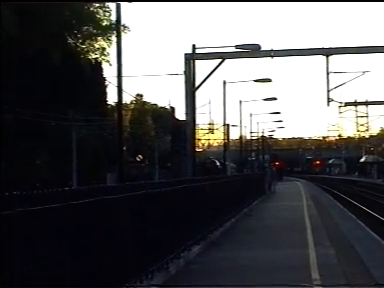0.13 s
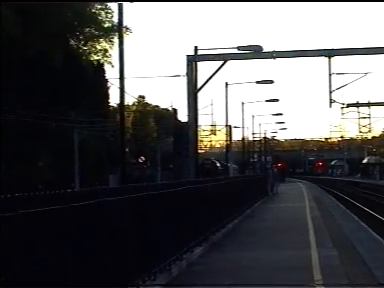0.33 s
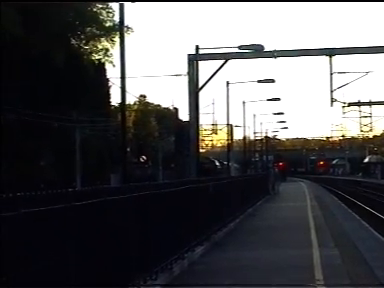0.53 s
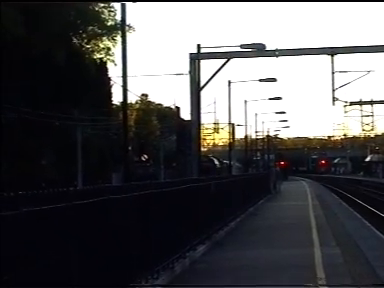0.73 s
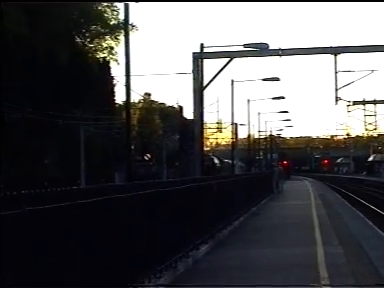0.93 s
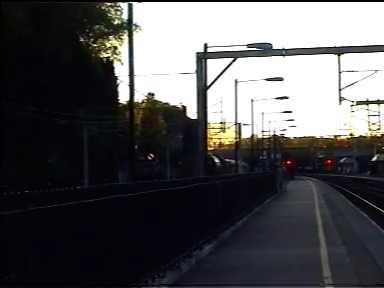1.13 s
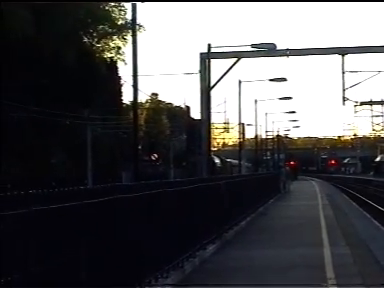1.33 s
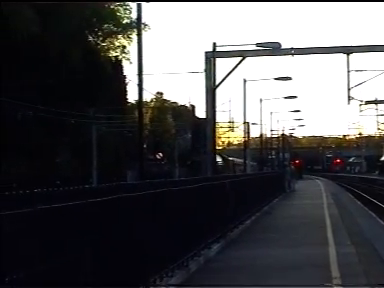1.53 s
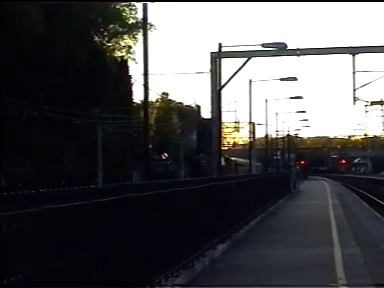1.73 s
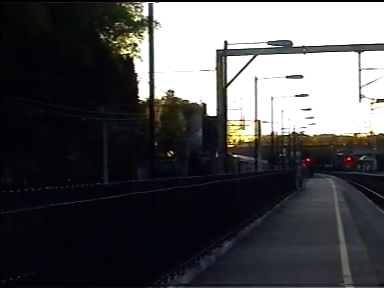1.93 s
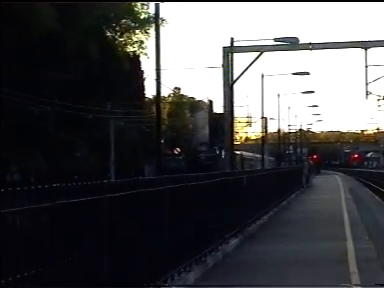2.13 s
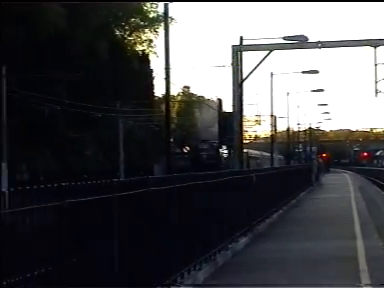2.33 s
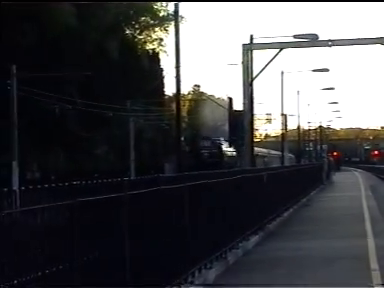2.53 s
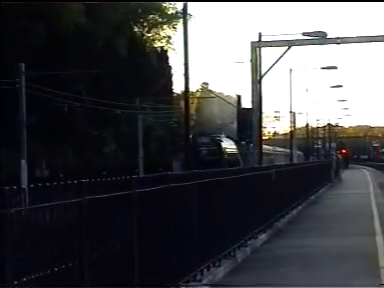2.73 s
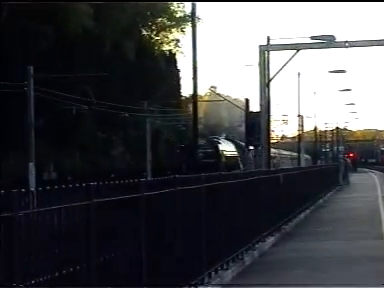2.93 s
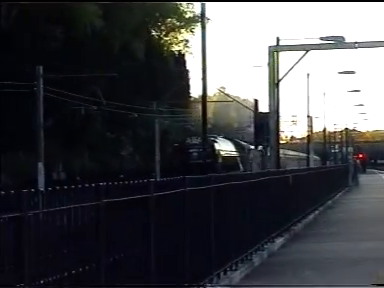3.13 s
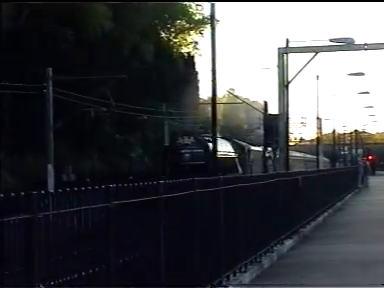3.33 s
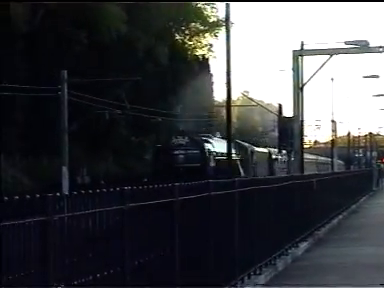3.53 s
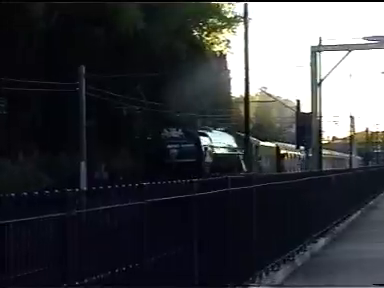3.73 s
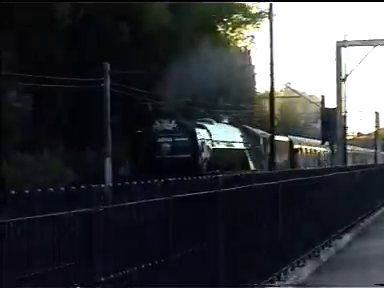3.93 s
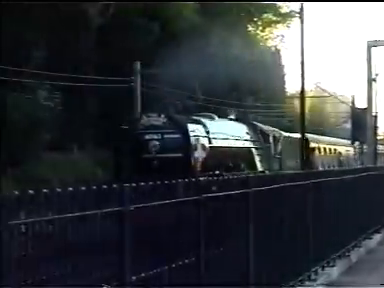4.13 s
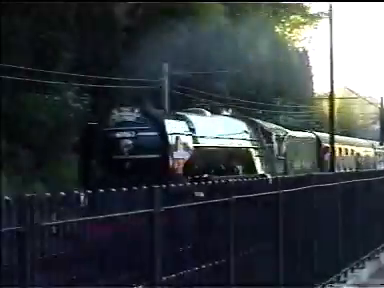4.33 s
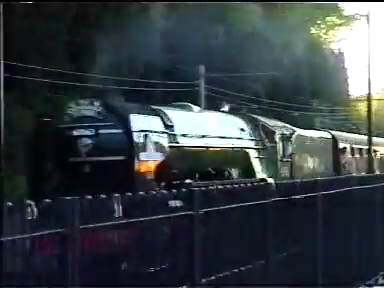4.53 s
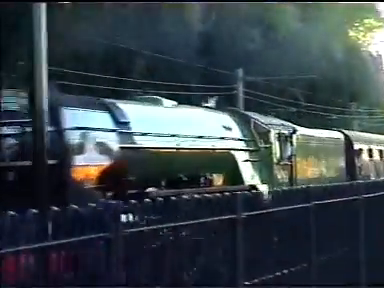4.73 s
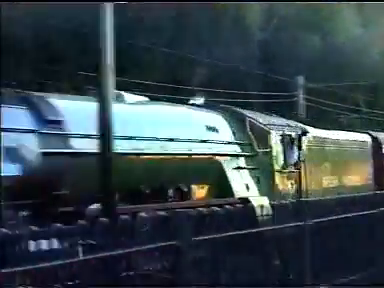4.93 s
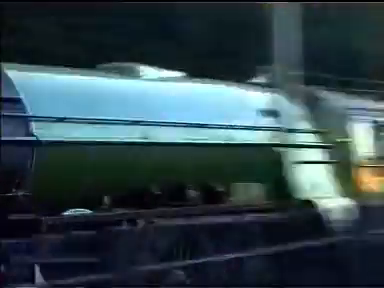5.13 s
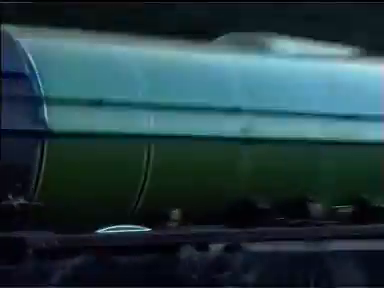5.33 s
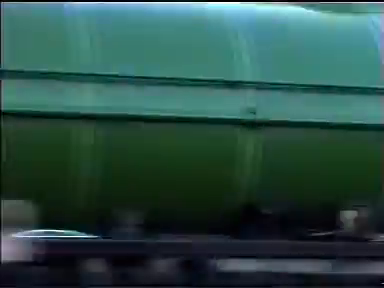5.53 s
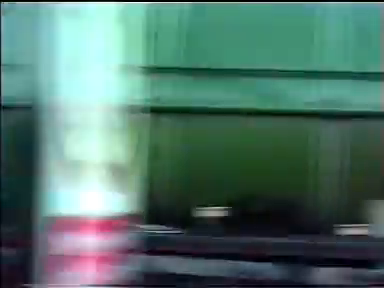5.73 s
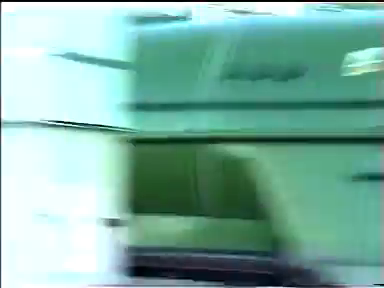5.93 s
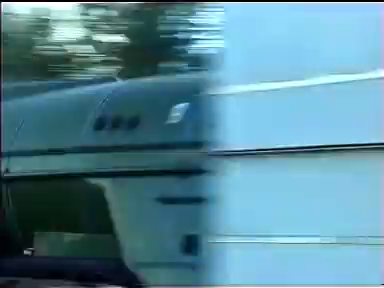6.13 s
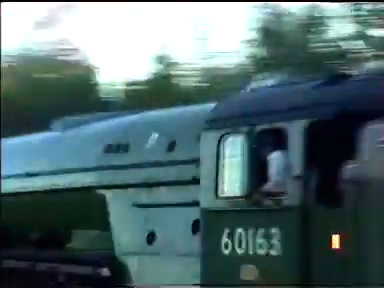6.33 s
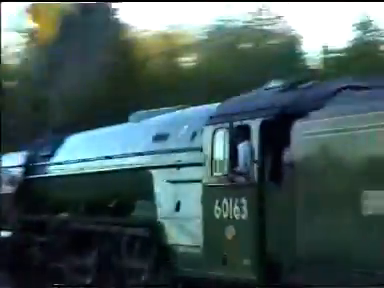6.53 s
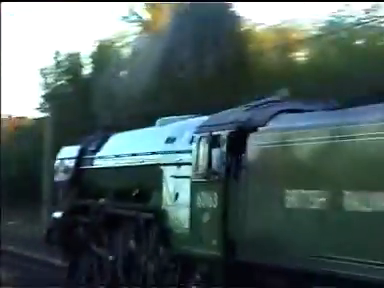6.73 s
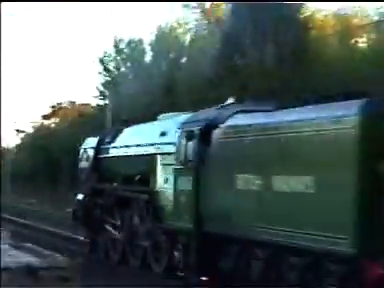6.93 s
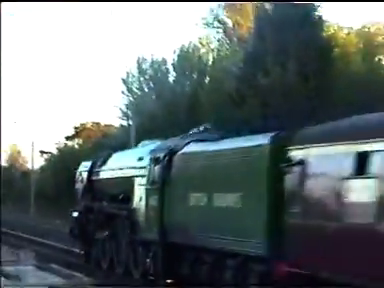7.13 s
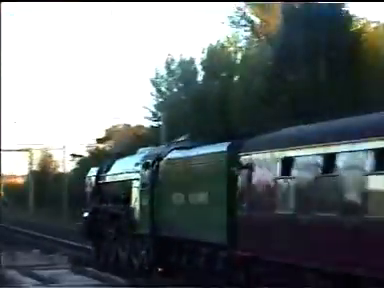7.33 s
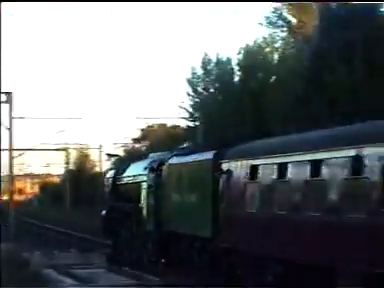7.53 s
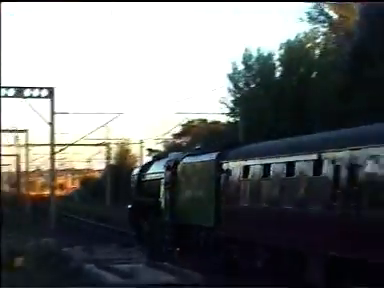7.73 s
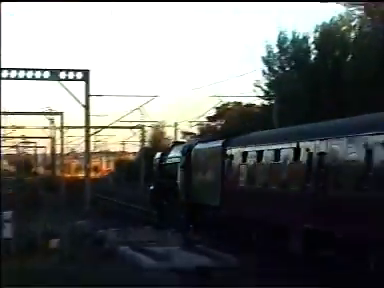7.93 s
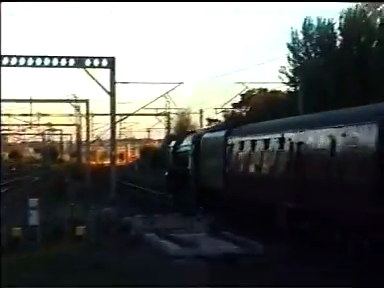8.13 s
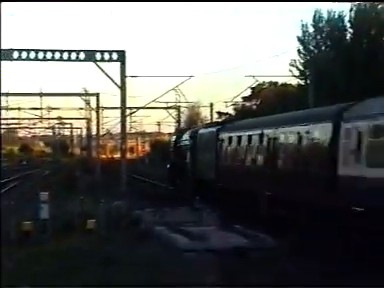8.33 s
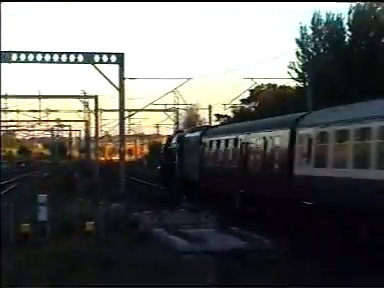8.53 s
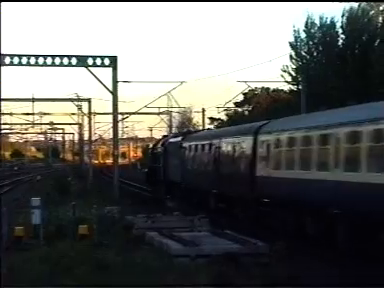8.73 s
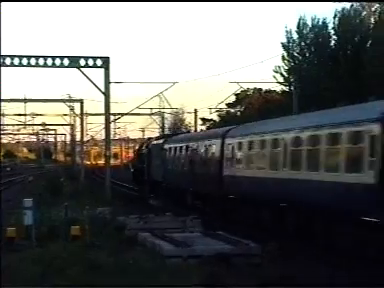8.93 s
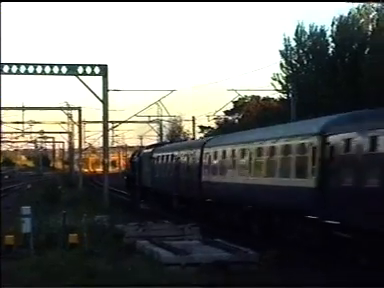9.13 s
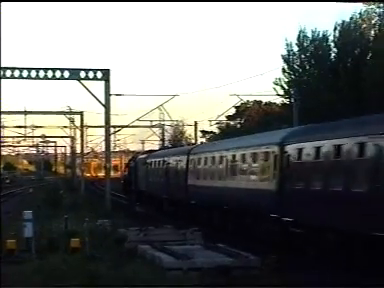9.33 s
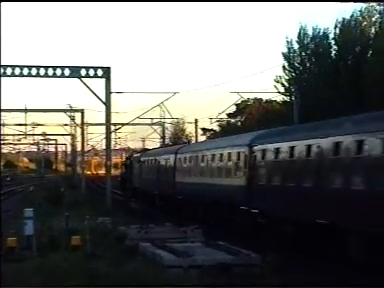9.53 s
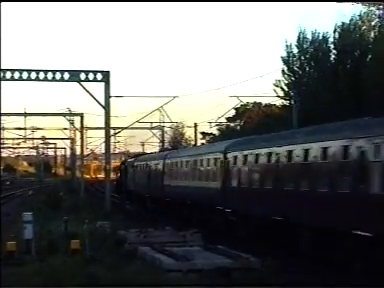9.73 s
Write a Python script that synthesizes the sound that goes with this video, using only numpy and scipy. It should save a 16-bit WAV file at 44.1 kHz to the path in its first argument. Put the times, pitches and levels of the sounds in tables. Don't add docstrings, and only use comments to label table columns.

```python
import sys
import numpy as np
from scipy import signal
from scipy.fft import rfft, irfft, next_fast_len
from scipy.io import wavfile
from scipy.ndimage import uniform_filter1d, map_coordinates

SR = 44100
rng = np.random.default_rng(int(sys.argv[2]) if len(sys.argv) > 2 else 0)


def transcribe(signal):
    frames = np.atleast_2d(signal).T
    limited = np.clip(frames, -1, 1)
    pcm = np.round(limited * 32767).astype(np.int16)
    wavfile.write(sys.argv[1], SR, pcm)


def level_to_linear(level):
    exponent = np.asarray(level, float) / 20
    return 10 ** exponent


N = 431738
M = next_fast_len(N, True)
T, F = np.arange(N) / SR, np.fft.rfftfreq(M, 1 / SR)
SPEED_MS, PASS_S, GAP_M = 23.5, 5.5, 8

# time_s, echo_delay_ms, echo_share, port_likeness (0-1), left_lag_samples
PATH = [(0, 1.56, 0.3, 0.9, -0.043), (2.5, 1.52, 0.13, 0.92, 0.53), (4.5, 1.63, 0.21, 0.77, 0.46),
        (5.4, 1.7, 0.1, 0.74, 0.85), (6.5, 1.6, 0.09, 1, 0.58), (7.5, 1.67, 0.07, 0.5, 0.27),
        (9.79, 1.48, 0.21, 0, -1.2)]
# time_s, level_db
ENGINE = [(0, -41.5), (1.2, -39), (2.3, -35.5), (2.7, -33), (3.2, -30.5), (3.5, -28.5), (4.5, -30.5),
          (5.4, -32.5), (5.9, -36.5), (6.7, -40.5), (7.4, -44), (8.2, -46.5), (9.2, -45.5), (9.79, -48)]
# time_s, level_db
TRACK = [(0, -35.5), (1, -33), (2.4, -28.5), (3, -27), (3.5, -24), (4.4, -25), (5.5, -24), (6.2, -24.5),
         (6.7, -26), (8, -26.5), (9.79, -27)]
# time_s, level_db, half_length_s
RAIL_SURGES = [(.3, 0.5, .08), (.5, -1, 0.054), (.6, -1.5, .04), (1.0, -3, 0.048), (1.3, -0.5, .1),
               (1.51, -3.5, 0.04), (1.7, 0.5, 0.057), (2.17, 0, 0.046), (2.26, -4, 0.021),
               (2.46, -3.5, 0.044), (2.7, -2, .06), (2.9, 3, 0.066), (3.55, 1, .08), (3.96, -3.5, 0.032),
               (4.62, -1.5, .05), (4.75, 2.5, 0.063), (5.36, -2, 0.05), (5.51, 2, 0.036), (5.68, -1, .08),
               (5.89, 0.5, 0.042), (6.34, 1.5, 0.14), (6.53, -2, 0.056), (6.68, 0, 0.036), (7.2, 1, 0.045),
               (7.36, -0.5, .08), (7.6, 1.5, 0.11), (7.92, 1.5, 0.047), (8.21, -1.2, .04), (8.85, 0, .04),
               (8.97, 0.5, 0.046), (9.73, -1, 0.038)]
# time_s, level_db, half_length_s
WHEEL_SURGES = [(.55, -5, 0.031), (1.717, 2, .05), (2.43, 2, 0.055), (2.72, 0, .05), (2.96, 1.5, 0.045),
                (3.17, 0, 0.12), (3.71, 2.5, .05), (5.09, 1, .05), (5.282, 1.5, 0.067), (5.9, 2, 0.084),
                (6.07, 2, .05), (6.328, 1, 0.045), (6.61, -3, .03), (6.69, 0.5, 0.036), (6.767, -3, 0.033),
                (6.95, -1.5, .08), (7.1, -2, 0.027), (7.22, -6, 0.022), (7.33, -2.5, .04),
                (7.44, -3.5, 0.05), (7.83, -1, .05), (8.183, -3, 0.037), (8.27, -1.5, .03),
                (8.35, 2.5, 0.033), (8.508, 2, .04), (8.72, 0, .04), (8.8, -0.5, .06), (8.97, -2, 0.037),
                (9.335, 1.5, .06), (9.42, 0.5, .05), (9.7, 1, 0.078)]
# time_s, level_db, half_length_s
BED_SURGES = [(.3, 0, .06), (.82, 3, 0.087), (1.23, 2.5, 0.17), (1.69, 3, 0.074), (1.9, -1, .08),
              (2.33, 0.5, .1), (3.12, -3, .06), (3.32, 0.5, 0.12), (4.2, -2, 0.17), (4.65, -1, .1),
              (5.27, -2.5, .05), (5.82, 2, .1), (6.15, 5.5, .08), (6.62, -6, .04), (7.1, 3, .15),
              (7.38, -2.5, .07), (6.85, 4, .1), (7.62, -6, .08), (7.97, -4, .03), (7.8, 4, 0.063),
              (8.05, 6, 0.12), (8.36, -12, 0.14), (8.78, 5, .07), (9.22, -4, .07), (9.55, 2.5, .1),
              (9.75, 4, 0.073)]


def along(table):
    s, *columns = np.transpose(table)
    return [np.interp(T, s, c) for c in columns]


def across(table):
    hz, *columns = np.transpose(table)
    return [np.interp(np.log(F + 1), np.log(hz), c) for c in columns]


def rise(at_s, length_s):
    return 1 / (1 + np.exp((at_s - T) / length_s))


def walk(rate_hz):
    k = int(SR / rate_hz)
    held = np.repeat(rng.standard_normal(N // k + 1), k)
    steps = uniform_filter1d(uniform_filter1d(held, k), k)
    return 1.2 * (steps - uniform_filter1d(steps, 3 * k))[:N]


def surges(table, size=64):
    coarse_s = T[::size]
    total_db = sum(db * np.exp(-((coarse_s - s) / half_s) ** 2) for s, db, half_s in table)
    return np.interp(T, coarse_s, total_db)


def delay(x, samples):
    return map_coordinates(x, [np.arange(N) - samples], order=3, mode="nearest")


def noise(shape, lo_hz, hi_hz):
    gain = level_to_linear(across(shape)[0])
    band = (F > lo_hz) & (F < hi_hz)
    gain = gain / np.sqrt(np.sum(gain[band] ** 2) / len(F))
    return rfft(rng.standard_normal((3, M))) * gain


def ports(spectra, envelope, pan_db, spread, like=None):
    # pitch_hz, left_minus_right_db, likeness (0-1)
    pair = [(61.7, -17, 0), (106, -4, 0.5), (150, -1, 0.6), (198, -1, 0.95), (292, 3, 1), (434, 5, 0.93),
            (600, 4, 0.98), (775, 2, 0.94), (1060, 3, 0.85), (1400, 3.5, 0.87), (2440, 2.5, 0.78),
            (4230, 3, 0.78), (6800, 0.5, 0.7), (8800, -0.5, .62), (10400, -0.5, 0.27), (13500, 0.5, 0.56)]
    # pitch_hz, lead_rad
    phase = [(60, -1), (108, -2), (195, -1.7), (290, -1.35), (430, -1.15), (600, -.95), (800, -.6),
             (1350, -.17), (2460, -.05), (5800, -.35), (8800, -.15), (10300, .4), (12000, .7)]
    (tilt_db, share), (lead_rad,) = across(pair), across(phase)
    share = np.clip(share, 0, 1) ** spread
    turn = level_to_linear(tilt_db / 2) * np.exp(.5j * lead_rad)
    side = np.array([turn, 1 / turn])
    direct = irfft(spectra[0] * side * np.sqrt(share), M)[:, :N]
    scattered = irfft(spectra[1:] * side * np.sqrt(1 - share), M)[:, :N]
    if like is not None:
        apart = irfft(spectra[1:] * side * np.sqrt(share) * 1j, M)[:, :N]
        direct = np.sqrt(like) * direct
        scattered = scattered + np.sqrt(1 - like) * apart
    return np.array([direct, scattered]) * envelope * level_to_linear(np.array([pan_db, -pan_db]) / 2)


def metres():
    return np.hypot(SPEED_MS * (T - PASS_S), GAP_M)


def swing(late_s=0):
    return rise(6.25 + late_s, 0.4)


def gusts():
    ahead_db, behind_db = .5, 1.3
    return ahead_db + (behind_db - ahead_db) * rise(PASS_S, 0.33)


def flares():
    # time_s, level_db, half_length_s
    shadows = [(0, 1.5, 0.024), (.52, 0.5, .15), (1.05, -1.5, .04), (1.4, -1, .05), (1.73, 1, .04),
               (2.45, -1, 0.066), (2.65, 1.5, 0.032), (2.75, -2, .03), (2.86, 1.5, .03), (3.01, -1, .04),
               (3.37, 2.5, 0.044), (4.65, 1, 0.029), (4.8, -3, .05), (5.03, -2, 0.023), (5.18, 1, 0.028),
               (5.34, 2.5, .05), (5.52, -1, 0.039), (5.664, 2, 0.06), (5.72, -1.5, 0.022),
               (5.87, -3.5, 0.086), (5.985, 2.5, .045), (6.05, -2, .04), (6.12, 1.5, 0.045),
               (6.21, -1.5, .025), (6.27, -3, 0.019), (6.36, -2, 0.03), (6.44, 2.5, 0.023), (6.59, 1, .025),
               (6.69, 4, 0.066), (6.82, 4, 0.02), (6.88, 3, .025), (7.04, 1, .04), (7.18, 3.5, 0.03),
               (7.22, -2, 0.018), (7.274, 2, 0.03), (7.35, -2, 0.04), (7.557, 3, 0.05), (7.66, 0.5, .04),
               (7.76, 1, .03), (7.912, 3, .04), (8.14, 1.5, .025), (8.204, -4, .05), (8.352, 3, 0.041),
               (8.59, -3, .03), (8.67, -1, .025), (8.73, -3, .03), (8.84, 0.5, .04), (9.05, -1, .03),
               (9.22, 2.5, 0.05), (9.397, 2, .04), (9.56, 3, .04), (9.69, 0, .04)]
    return surges(shadows)


def camcorder():
    # pitch_hz, level_db
    hum_tones = [
        (50, -66.5),
        (100, -88),
    ]
    # pitch_hz, density_db_per_hz
    case_shape = [(8, 6), (30, -3), (55, -3), (80, -16), (150, -31)]
    duck_db = -10 * (rise(2.6, .15) - 0.95 * (rise(6.85, .15) - rise(9.55, .08)))
    hum = 0
    for hz, db in hum_tones:
        hum = hum + np.sqrt(2) * level_to_linear(db + duck_db + .8 * walk(2.8)) * np.sin(2 * np.pi * hz * T)
    hum = hum * np.array([[.82], [1.18]])
    case = level_to_linear(-63.5 + 1.4 * walk(2.5)) * irfft(noise(case_shape, 14.7, 90)[1:], M)[:, :N]
    hiss = level_to_linear(-88) * rng.standard_normal((2, N))
    return hum + case + hiss


def ground_shake():
    # pitch_hz, density_db_per_hz
    thud = [(20, -8), (35, -5), (60, -4), (90, 1), (140, 2), (200, -22), (600, -55)]
    bed_db = surges(BED_SURGES)
    engine = level_to_linear(-54.5 + 0.66 * bed_db + 1.5 * walk(3.4)) * np.exp(-((T - 4.36) / 1.5) ** 2)
    coaches = level_to_linear(-67 + 0.77 * bed_db + 4.5 * walk(7.1)) * rise(6.1, 0.34)
    return ports(noise(thud, 50, 170), np.hypot(engine, coaches), np.full(N, 3.3), 0.96)


def bed_rumble():
    # pitch_hz, density_db_per_hz
    rumble = [(20, -29), (60, -20), (100, -20.5), (140, -16), (190, -8.5), (250, -2.4), (330, -4.5),
              (420, -3.5), (550, -22), (1500, -60)]
    turned = swing()
    engine = level_to_linear(along(ENGINE)[0] - 14 - 5 * turned)
    late = level_to_linear(-52) * rise(9.04, 0.6)
    bed_db = 20 * np.log10(np.hypot(engine, late)) + surges(BED_SURGES) + 0.5
    pan_db = 0.43 * (5 + 6.5 * turned) + 6.0
    return ports(noise(rumble, 90, 325), level_to_linear(bed_db + (2.0 + 2.3 * turned) * walk(3.9)), pan_db, 0.52)


def rolling(beat_db):
    # pitch_hz, density_db_per_hz
    engine_rail = [(150, -70), (250, -16.5), (450, -11), (590, 0), (750, -0.5), (900, -1), (1050, -7.5),
                   (1500, -16.5), (3000, -37.5), (9000, -62)]
    # pitch_hz, density_db_per_hz
    engine_wheel = [(150, -60), (500, -40), (1000, -11.5), (1200, 0), (1340, -3), (1450, -2), (1570, -6),
                    (1700, -2), (1850, -5), (2250, -5.5), (3100, -8.5), (3600, -14), (5000, -20),
                    (8000, -59)]
    # pitch_hz, density_db_per_hz
    coach_rail = [(100, -63), (170, -32.5), (250, -28), (420, -6.5), (560, -2.5), (640, 1), (740, 1.5),
                  (860, 1.5), (950, 0), (1080, -3.5), (1500, -23), (3000, -48), (9000, -66)]
    # pitch_hz, density_db_per_hz
    coach_wheel = [(150, -60), (500, -23), (1000, -2.5), (1350, -2), (1580, -4), (1850, -2), (2400, -6),
                   (3100, -9.5), (3600, -14.5), (5000, -18), (8000, -33)]
    rail_db = along(TRACK)[0]
    drivers, bogies = level_to_linear(along(ENGINE)[0] + 5.5), level_to_linear(rail_db - 7.5)
    wheel_db = 20 * np.log10(np.hypot(drivers, bogies))
    pan_db = 5 + 6.5 * swing()
    jolt_db = 0.095 * flares() + 0.55 * gusts() * walk(15)
    coach = rise(6.1, 0.34)
    bogie = rise(5.3, 0.32)
    roar = level_to_linear(rail_db + surges(RAIL_SURGES) - 1.55 + .5 * jolt_db + 0.51 * walk(13))
    ring_db = wheel_db - 3.0 + surges(WHEEL_SURGES) + 1.1 * jolt_db
    ring = level_to_linear(ring_db + 0.88 * walk(16) + 1.2 * beat_db)
    out = ports(noise(engine_rail, 530, 895), roar * np.sqrt(1 - coach), pan_db - 5.0, 3.5)
    out += ports(noise(engine_wheel, 990, 3600), ring * np.sqrt(1 - bogie), pan_db - 5.0, 1.6)
    out += ports(noise(coach_rail, 460, 920), roar * np.sqrt(coach), pan_db - 4.0, 1.7)
    out += ports(noise(coach_wheel, 1210, 2080), ring * np.sqrt(bogie), pan_db - 5.5, 3.2)
    return out


def singing():
    # pitch_hz, width_share_of_pitch, engine_db, coach_db (above track level)
    bands = [
        (863, 0.086, -16.5, -7),
        (1340, 0.12, -5, -15.5),
        (1850, 0.1, -10.5, -18),
        (2560, 0.12, -26, -19),
    ]
    # time_s, level_db, half_length_s
    ring_surges = [(.64, 3, .06), (.77, -6, .04), (1.13, 2.5, .06), (1.423, 6, 0.046), (2.1, -4, 0.35),
                   (2.45, -16, .1), (2.9, -6, 0.23), (5.9, 5, 0.096), (6.15, 2, .1), (6.39, 4, .08),
                   (6.7, 4, .06), (6.95, 8, 0.072), (7.65, 1, .06), (8.27, -2, .04), (8.42, -10, .06),
                   (8.782, 0, .08), (9.45, 5, .06), (9.7, 4, 0.09)]
    # time_s, level_db, half_length_s
    upper_surges = [(.7, -1, 1.0), (2.85, 4.5, 0.29), (3.41, 7, 0.065), (3.71, 5, .08), (3.87, -11, .05),
                    (4.4, 3, 0.55), (5.15, 7, 0.29), (6.69, 5, 0.041), (6.85, 7, 0.16), (7.15, 4, .08),
                    (7.8, 4, .06), (8.35, 3, 0.042), (8.52, 3, .04), (8.73, -8, .06), (9.33, 1, .08),
                    (9.6, -12, .15)]
    skirt = [(-5, -80), (-3, -36), (-1, -6), (0, 0), (1, -6), (3, -36), (6, -80)]  # widths, dB
    late, out = rise(4.9, 0.52), 0
    pan_db = 6.5 * swing() - 0.6
    follows = [RAIL_SURGES, ring_surges, upper_surges, WHEEL_SURGES]
    for (hz, width, ahead_db, behind_db), table in zip(bands, follows):
        shape = [(hz * (1 + k * width), db) for k, db in skirt]
        level_db = along(TRACK)[0] + ahead_db + (behind_db - ahead_db) * late
        swell_db = level_db + surges(table) + .8 * walk(4.5) + 2.2 * walk(11)
        out = out + ports(noise(shape, 300, 4000), level_to_linear(swell_db), pan_db, 1.7)
    return out


def flecks():
    # time_s, pitch_hz, level_db, half_length_s
    rings = [(0.473, 817, -37, 0.07), (1.17, 3229, -43, 0.065), (1.3, 817, -35, 0.065),
             (2.98, 817, -36, 0.07), (4.34, 4808, -35, 0.07), (4.93, 4894, -46, 0.07),
             (4.97, 3120, -36, 0.07), (5.507, 620, -26, 0.064), (6.03, 4090, -46, 0.07),
             (6.09, 4760, -50, 0.07), (6.65, 3631, -47, 0.07), (6.71, 1860, -38, 0.055),
             (6.79, 893, -30, 0.077), (6.86, 4722, -52, 0.07), (7.12, 2550, -47, 0.07),
             (7.15, 3631, -51, 0.07), (7.23, 4808, -52, 0.07), (7.59, 4808, -56, 0.07),
             (7.61, 870, -29, 0.07), (8.306, 1277, -35, 0.078), (8.32, 1780, -43, 0.07),
             (8.33, 2368, -41, 0.07), (8.82, 1226, -37, 0.076), (8.85, 4350, -55, 0.07),
             (8.89, 2440, -42, 0.07), (9.51, 2999, -41, 0.092), (9.71, 1410, -37, 0.083)]
    out = np.zeros(N)
    waver_s = np.cumsum(1 + 0.0093 * walk(40)) / SR
    flutter = level_to_linear(3.0 * walk(35))
    for s, hz, db, half_s in rings:
        near = slice(max(int((s - 3 * half_s) * SR), 0), int((s + 3 * half_s) * SR))
        bell = np.exp(-((T[near] - s) / half_s) ** 2)
        out[near] += level_to_linear(db) * bell * np.sin(2 * np.pi * hz * waver_s[near])
    direct_only = np.array([[1], [0], [0]])
    return ports(rfft(out * flutter, M) * direct_only, 0.86, 1.0 + 6.5 * swing(), 0)


def beats():
    cylinder_share = [.5, 1.4, 1, .9, .9, 1.1]
    turn = 22.96 * (T - metres() / 343)
    count = np.floor(turn).astype(int)
    size = np.array(cylinder_share)[count % 6] * np.abs(1 + .7 * rng.standard_normal(400)[count])
    depth_db = .28 + .85 * np.exp(-((T - 6.3) / 1.7) ** 2)
    return depth_db * uniform_filter1d(size, 800) * np.cos(2 * np.pi * (turn - .455))


def steam(beat_db):
    # pitch_hz, density_db_per_hz
    jet_shape = [(600, -56), (1700, -2), (2600, -1.4), (3200, 1.5), (4000, -0.5), (5200, -1.5),
                 (6900, -1.5), (8000, -4), (10500, -7), (12000, -6), (13500, -5.5), (15000, -17)]
    near_m = 25
    flare_db, gust_db = flares(), gusts()
    loss_db_per_m = np.where(T < PASS_S, 0.14, 0.16)
    air_db = loss_db_per_m * (np.hypot(metres(), near_m) - near_m)
    trees_db = -10 * (1 - rise(2.33, 0.15))
    top_db = -3.0 - air_db + trees_db - 0.12 * flare_db
    pan_db = 3.5 + 2 * swing(1.6) - 2.5 * (GAP_M / metres()) ** 0.75
    like = np.clip(along(PATH)[2], 0, 1)
    jet = noise(jet_shape, 3564, 5400)
    upper = 1 / (1 + (7000 / (F + 1)) ** 4)
    air = upper / (1 + (11000 / (F + 1)) ** 8)
    puff = level_to_linear(along(ENGINE)[0] + flare_db - 0.65 + 1.4 * beat_db + 1.1 * gust_db * walk(13))
    body_gain = puff * level_to_linear(gust_db * walk(25))
    top_gain = puff * level_to_linear(top_db + 6.0 + gust_db * walk(27))
    sizzle_gain = puff * level_to_linear(3.2 * top_db + 12.0 + 1.6 * walk(48))
    body = ports(jet * (1 - upper), body_gain, pan_db - 2.0, 1.3, like)
    top = ports(jet * (upper - air), top_gain, 0.55 * pan_db - 0.5, 0.91, like)
    sizzle = ports(jet * air, sizzle_gain, 0.45 * pan_db - .6, 1.0)
    return body + top + sizzle


def ground(direct):
    delay_ms, share, _, lag_samples = along(PATH)
    band = signal.butter(1, [650, 3300], "bandpass", fs=SR, output="sos")
    bounce = signal.sosfilt(band, direct)
    both = direct + share * np.array([delay(c, delay_ms * SR / 1000) for c in bounce])
    return np.array([delay(both[0], lag_samples), both[1]])


def glance(x):
    # time_s, delay_ms
    platform = [(0, 1.53), (1.5, 1.54), (2.9, 1.577), (3.85, 1.597), (4.8, 1.654), (5.6, 1.70),
                (6.5, 1.675), (7.6, 1.75), (9.79, 1.75)]
    shell_ms = np.array([[.487], [.38]])
    spectrum = rfft(x, M) / (1 + (4000 / (F + 1)) ** 4)
    shell = -.1 * np.exp(-2j * np.pi * F * shell_ms / 1000) / (1 + (F / 8000) ** 4)
    share = .13 + (.05 - .13) * swing()
    lag_samples = along(platform)[0] * SR / 1000
    late = np.array([delay(c, lag_samples) for c in irfft(spectrum, M)[:, :N]])
    return x + share * late + irfft(spectrum * shell, M)[:, :N]


def scene():
    beat_db = beats()
    train = ground_shake() + bed_rumble() + rolling(beat_db) + singing() + flecks() + steam(beat_db)
    direct, scattered = train
    return glance(ground(direct) + scattered) + camcorder()


def roll_off(x):
    return signal.sosfilt(signal.butter(12, 14950, fs=SR, output="sos"), x)


def record(dry):
    hold_db = -23.5
    power = uniform_filter1d(np.mean(dry ** 2, axis=0), 450)
    held = level_to_linear(0.86) * dry * np.maximum(power / level_to_linear(hold_db) ** 2, 1) ** -.17
    mix = np.tanh(0.77 * held) / 0.83 + .0008
    return roll_off(mix)


dry = scene()
out = record(dry)
transcribe(out)
```